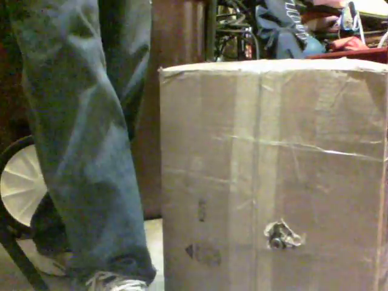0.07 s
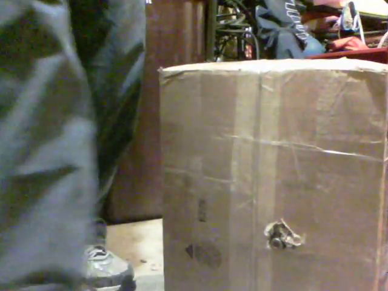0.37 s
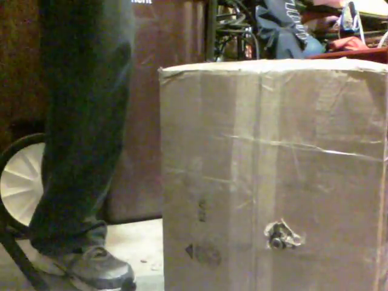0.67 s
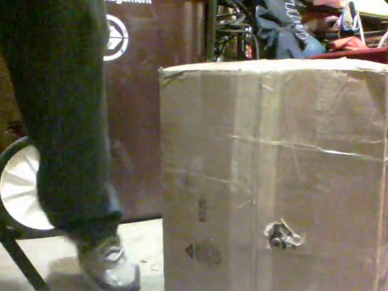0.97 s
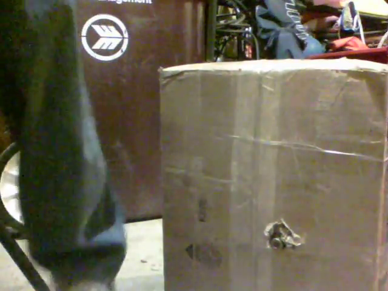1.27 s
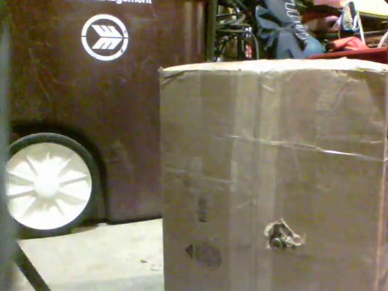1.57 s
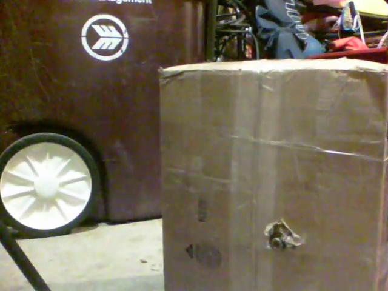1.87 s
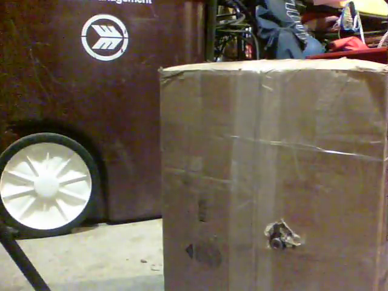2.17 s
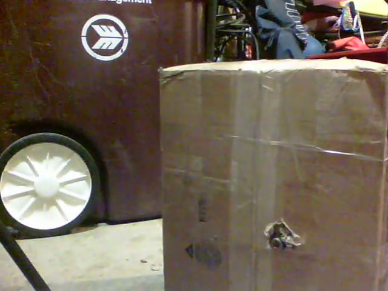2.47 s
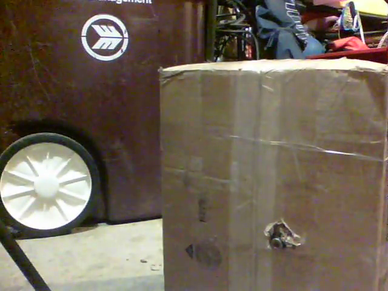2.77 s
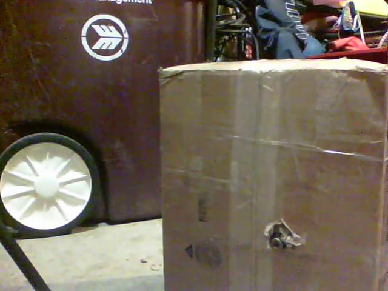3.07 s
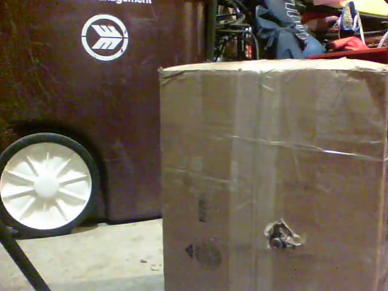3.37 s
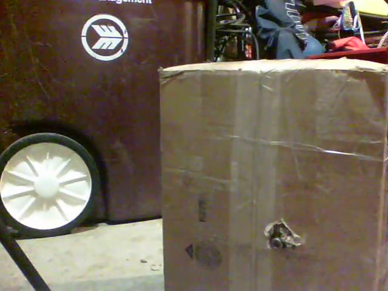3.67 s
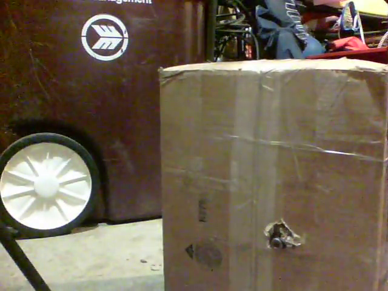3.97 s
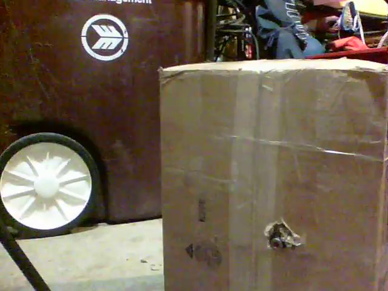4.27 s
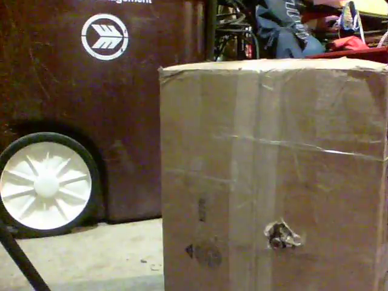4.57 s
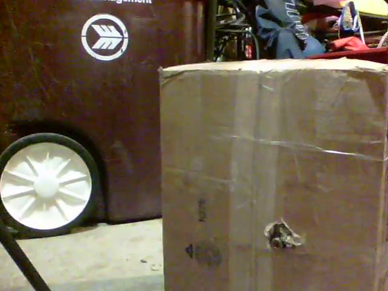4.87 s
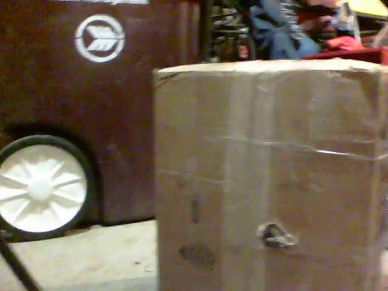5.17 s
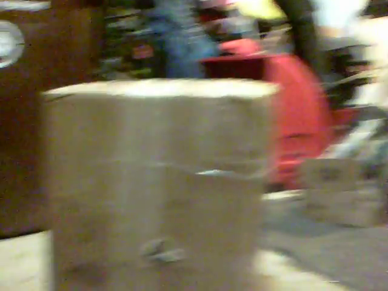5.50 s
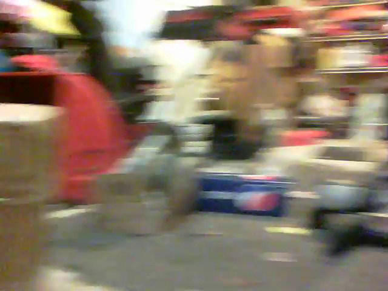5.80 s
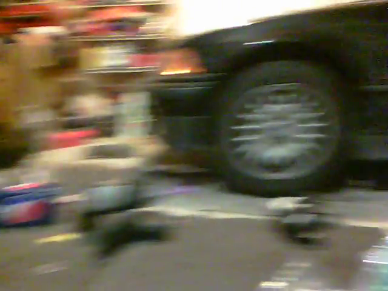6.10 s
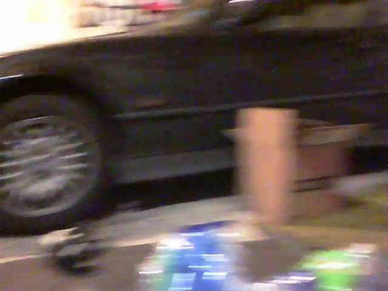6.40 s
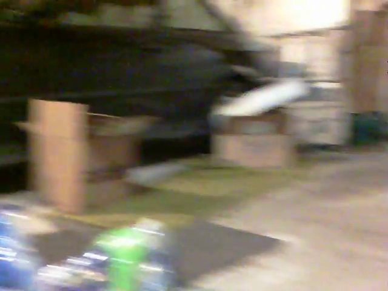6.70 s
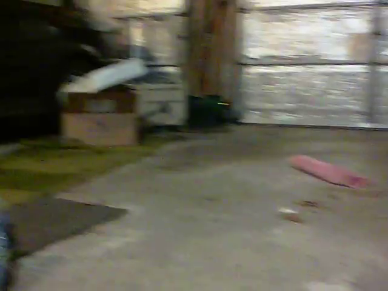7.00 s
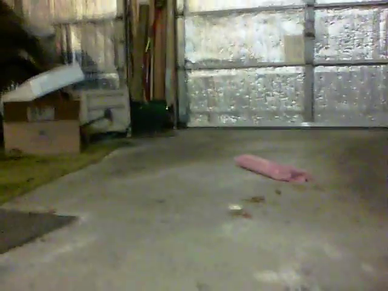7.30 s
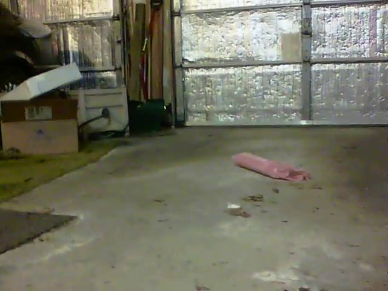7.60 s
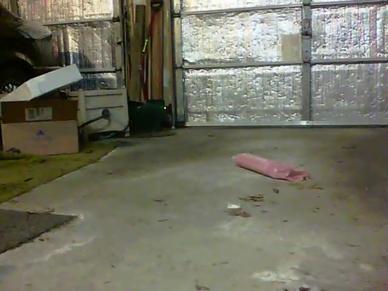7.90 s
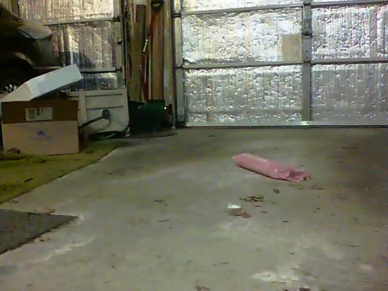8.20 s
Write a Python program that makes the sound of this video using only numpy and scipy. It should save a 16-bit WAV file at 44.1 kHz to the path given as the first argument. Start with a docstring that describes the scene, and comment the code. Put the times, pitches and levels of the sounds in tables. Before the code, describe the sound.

Shoes scuff and tick on a gritty concrete garage floor over a faint hum and hiss. About halfway through, a large cardboard box is gripped, bumped and dragged in a quick cluster of hollow thumps. After a short lull, a loud, dull knock right by the microphone overloads it. A sharp click follows, and the box thumps and scrapes a few more times, a little quieter.

```python
"""Shoes scuff and tick on a concrete garage floor, over a faint hum, as someone walks round a large
cardboard box. The box is gripped, bumped, dragged and set down in hollow thumps: each impact excites
the modes of its body, its enclosed air and its panels, and stick-slip friction makes it judder.
A knock close to the microphone overloads it, and the box thumps a few more times while the automatic
gain control holds the level down."""
import sys
import numpy as np
from scipy import signal
from scipy.fft import rfft, irfft
from scipy.io import wavfile
from scipy.ndimage import uniform_filter1d

SR = 44100
rng = np.random.default_rng(int(sys.argv[2]) if len(sys.argv) > 2 else 0)


def put_to_file(sound):
    """Save the sound as 16-bit audio at rate SR, in the file named by the first command-line argument."""
    columns = np.atleast_2d(sound).T  # one column per channel
    safe = np.clip(columns, -1, 1)
    whole_steps = np.round(safe * 32767)
    wavfile.write(sys.argv[1], SR, whole_steps.astype(np.int16))


N = 363815
TIME = np.arange(N) / SR
RING_TIME = TIME[:SR]  # the first second after an impact


def amp(db):
    """Amplitude ratio of a level in decibels."""
    return 10 ** (np.asarray(db) / 20)


def unit(x):
    """Normalisation to rms 1."""
    return x / np.sqrt(np.mean(x ** 2) + 1e-20)


def read(points, hz):
    """Interpolation of a table on a log-frequency axis."""
    f, value = np.transpose(points)
    return np.interp(np.log(hz + 1), np.log(f + 1), value)


def add(mix, s, sound):
    """Superposition: a sound joins the mix at s seconds."""
    part = mix[round(s * SR):][:len(sound)]
    part += sound[:len(part)]


def through(x, response):
    """Convolution with an impulse response, cut to the scene's length."""
    return signal.oaconvolve(x, response)[:N]


def passband(x, order, hz, kind):
    """Maximally flat low-, high- or band-pass filtering."""
    return signal.sosfilt(signal.butter(order, hz, kind, fs=SR, output="sos"), x)


def colour(x, spectrum, size=4096):
    """Minimum-phase filtering to a spectral shape; white noise keeps its power."""
    log_gain = np.log(amp(read(spectrum, abs(np.fft.fftfreq(size, 1 / SR)))))
    response = np.exp(np.conj(signal.hilbert(log_gain)))
    taps = np.fft.ifft(response).real[:size // 2]
    return through(x, taps / np.linalg.norm(taps))


def drift(hz):
    """Random fluctuation of rms 1, its spectrum falling away above hz."""
    rolloff = np.exp(-(np.fft.rfftfreq(N, 1 / SR) / hz) ** 2)
    return unit(irfft(rfft(rng.standard_normal(N)) * rolloff, N))


def ring(modes):
    """Modal impulse response: a sum of damped sinusoids."""
    return sum(amp(db - 60 * RING_TIME / t60) * np.sin(2 * np.pi * hz * RING_TIME)
               for hz, db, t60 in modes)


def contact(decay_s, rise_s):
    """Contact noise: a dying spray of tiny impacts as two rough faces meet."""
    return rng.standard_normal(SR) * np.exp(-RING_TIME / decay_s) * (1 - np.exp(-RING_TIME / rise_s))


def push(length_s):
    """Force pulse of unit impulse: the longer it lasts, the less treble it excites."""
    force = np.exp(-4 * RING_TIME / length_s) * RING_TIME
    return force / force.sum()


def stroke(peak_s, db, fall_s, rise_s=None):
    """Exponential swell and decay of sliding pressure; by default the swell is the quicker."""
    rise_s = rise_s or 0.69 * fall_s
    distance = np.maximum((peak_s - TIME) / rise_s, (TIME - peak_s) / fall_s)
    return amp(db) * np.exp(-np.minimum(distance, 20))


# Reverberation time of the garage: (frequency [Hz], T60 [s])
GARAGE_T60 = [(60, 1), (150, 0.64), (400, 0.38), (1000, 0.34), (3000, 0.44), (7000, 0.38)]
def garage(x, wet_db, spacing=22):
    """Reverberation: dense reflections from walls and clutter, each band absorbed at its own rate."""
    taps = np.zeros(SR)
    slots = np.arange(round(.006 * SR), SR - spacing, spacing)
    polarity = rng.choice([-1., 1.], SR)[:len(slots)]
    taps[slots + rng.integers(0, spacing, SR)[:len(slots)]] = polarity
    hz, t, bands = signal.stft(taps, SR, nperseg=256)
    absorption = amp(-60 * t / read(GARAGE_T60, hz)[:, None])
    tail = signal.istft(bands * absorption, SR, nperseg=256)[1]
    return x + amp(wet_db) * through(x, tail / np.linalg.norm(tail))


# Spectrum of the noise floor: (frequency [Hz], relative level [dB])
NOISE_SPECTRUM = [(12, -9), (21, 7.5), (43, -6), (96, -9.5), (160, -15), (260, -16), (480, -21),
                  (600, -18.5), (800, -24.5), (1500, -28.5), (2850, -31), (4930, -35.5), (6000, -40)]
def noise_floor(level_db=-39.45, flutter_db=2.94):
    """Broadband noise: microphone hiss and room rumble, the rumble modulated in amplitude."""
    shape = amp(read(NOISE_SPECTRUM, np.fft.rfftfreq(N, 1 / SR)))
    noise = irfft(rfft(rng.standard_normal(N)) * shape, N)
    rumble = passband(noise, 2, 120, "low")
    return amp(level_db) * unit(noise + rumble * (amp(flutter_db * drift(9.5)) - 1))


# Partials of an appliance's hum: (frequency [Hz], level [dB], modulation depth [ratio])
HUM_PARTIALS = [(93.5, -58, 1), (215.6, -50, 0.19), (340, -65.5, 0.18), (610, -63.5, 0.2), (738, -69, 0.5)]
def hum():
    """Amplitude and phase modulation: each partial of the hum wavers slowly."""
    out = np.zeros(N)
    for hz, db, depth in HUM_PARTIALS:
        envelope = amp(db) * np.sqrt(2) * (1 + depth * drift(3.9))
        out += envelope * np.sin(2 * np.pi * hz * TIME + 2 * depth * drift(2.2))
    return out


def snap(hz, half_width_octaves=0.31):
    """Band-limited transient: brief contact noise, its power independent of bandwidth."""
    band = np.clip(hz * 2 ** (np.array([-1, 1]) * half_width_octaves), 1, SR / 2 - 1)
    burst = passband(contact(decay_s=0.0049, rise_s=0.0023), 1, band, "band")
    return burst * np.sqrt(SR / np.pi / np.ptp(band))


# Shoes, hands and cardboard catching: (time [s], level [dB], centre frequency [Hz])
CATCHES = [(0.498, -23.5, 2960), (0.5607, -11.5, 1400), (0.599, -25, 2430), (0.788, -31, 1540),
           (1.1174, -31, 4700), (1.3009, -35.5, 4700), (1.5362, -29, 1400), (1.8703, -26.5, 2080),
           (1.9738, -32, 2390), (2.021, -33.5, 2240), (2.349, -29, 2200), (2.4826, -29, 4380),
           (2.583, -31, 2400), (2.662, -33.5, 4030), (2.9876, -29.5, 2430), (3.124, -28, 2060),
           (3.688, -16.5, 1340), (3.8659, -16.5, 2560), (7.0076, -30.5, 1340), (7.0784, -21, 2160),
           (7.1154, -10.5, 3110)]
def ticks(grit_db=-20.5, grit_spread_db=4.5, grit_hz=2400, grit_within_s=0.081, specks=2):
    """Small sources radiate little bass: sharp ticks, each followed by specks of loose grit."""
    out = np.zeros(N)
    for s, db, hz in CATCHES:
        add(out, s, amp(db - 1) * snap(hz))
        for late, (loudness, octaves) in zip(rng.random(specks), rng.standard_normal((specks, 2))):
            speck = amp(db + grit_db + grit_spread_db * loudness) * snap(grit_hz * 2 ** octaves)
            add(out, s + late * grit_within_s, speck)
    return garage(passband(out, 3, 950, "high"), wet_db=-6)


# Drags of the box over concrete: (peak time [s], level [dB], decay time [s])
BOX_DRAGS = [(4.49, -9, 0.094), (7.62, -14.5, 0.049), (7.76, -17.5, 0.13)]
def judder(slip_hz=54.06, unsteadiness=0.42):
    """Stick-slip friction: returns the pressure of the drags and their uneven train of slips."""
    pressure = sum(stroke(*drag) for drag in BOX_DRAGS)
    cycles = np.cumsum(slip_hz * np.exp(unsteadiness * drift(40))) / SR
    return pressure, pressure * np.diff(np.floor(cycles), prepend=0)


# Swishes of soles, cloth and hands: (peak time [s], level [dB], decay time [s])
SCUFFS = [(.505, -35.5, 0.045), (.62, -39, 0.029), (.73, -42, 0.03), (1.543, -37.5, 0.015),
          (1.91, -51, 0.28), (2.525, -43, 0.086), (2.67, -41.5, 0.025), (3.208, -31, 0.047),
          (3.712, -25, 0.029), (3.92, -41, 0.23), (4.12, -37.5, 0.049), (4.43, -34.5, 0.22),
          (4.72, -46, 0.044), (5.95, -48, 0.29), (6.98, -45, 0.24), (7.145, -33, .038), (7.88, -34, 0.025),
          (8.051, -35, 0.082)]
def rubbing(grains_per_s=700, uneven_db=2.5, drag_db=-28.5, scrape_db=-23, scrape_rise_s=0.0027):
    """Sliding friction: hiss and catching grains in each swish, each drag and a scrape after each tick."""
    strokes = [stroke(*scuff) for scuff in SCUFFS]
    strokes += [stroke(s, db + drag_db, fall_s) for s, db, fall_s in BOX_DRAGS]
    strokes += [stroke(s + 2 * scrape_rise_s, db + scrape_db, fall_s=0.048, rise_s=scrape_rise_s)
                for s, db, _ in CATCHES]
    pressure = np.sqrt(sum(each ** 2 for each in strokes))  # incoherent sources add in power
    sizes = amp(3.5 * np.minimum(rng.exponential(1, N), 5)) * rng.choice([-1, 1], N)
    grains = unit(sizes * (rng.random(N) < grains_per_s / SR))
    friction = unit(grains + 0.98 * rng.standard_normal(N)) * amp(uneven_db * drift(38))
    return friction * pressure


# Spectrum of the rubbing surfaces: (frequency [Hz], relative level [dB])
SURFACE_SPECTRUM = [(100, -17.5), (400, 1.5), (850, -5.5), (1200, -0.5), (2500, -0.5), (3500, -4),
                    (5000, -3.5), (7000, -8.5)]
def surfaces(friction):
    """Source and filter: the rubbing surfaces colour the friction noise they radiate."""
    return garage(colour(friction, SURFACE_SPECTRUM), wet_db=-8)


# Jolts of the microphone: (time [s], level [dB], hold [s], decay time [s], corner frequency [Hz])
MICROPHONE_JOLTS = [(0.439, -29.5, 0.0033, 0.01, 600), (6.831, 15.5, 0.027, 0.00028, 233),
                    (6.858, -11.5, 0.01, 0.014, 80), (6.963, -24.5, 0.076, 0.16, 47),
                    (7.086, -22, 0.019, 0.14, 46.7), (7.116, -21, 0.0037, 0.026, 445)]
def jolts(mount_hz=116, mount_db=-26, mount_t60=0.42):
    """Structure-borne sound: dull knocks reach the microphone by the floor and its mount, which rings."""
    knocks, mount = np.zeros((2, N))
    for s, db, hold_s, decay_s, corner_hz in MICROPHONE_JOLTS:
        # the shaking thins out gently above the corner, then ends steeply
        shake = passband(rng.standard_normal(2 * SR), 1, corner_hz, "low")
        shake = passband(shake, 3, [58, corner_hz * 3.47], "band")[SR:]
        attack = 1 - np.exp(-RING_TIME / 0.00039)
        force = attack * np.exp(-np.maximum(RING_TIME - hold_s, 0) / decay_s)
        shake_rms = np.sqrt(np.sum((shake * force) ** 2) / np.sum(force ** 2))
        add(knocks, s, amp(db) * force * shake / shake_rms)
        add(mount, s, amp(db) * ring([(mount_hz, mount_db, mount_t60)]))
    return garage(knocks, wet_db=-36.5) + mount


# Spectrum of a slap on cardboard: (frequency [Hz], relative level [dB])
SLAP_SPECTRUM = [(40, -28.5), (120, -5), (220, -3), (450, 0.5), (680, -0.5), (950, -10.5), (1250, -16.5),
                 (2000, -35), (5000, -53)]
# Modes of the cardboard panels: (frequency [Hz], relative level [dB], T60 [s])
BENDING_MODES = [(302, 7, 0.069), (406, -3, 0.29), (448.6, 4, 0.16), (540.4, 4, 0.17), (606, -3, 0.12),
                 (665, -19.5, 0.29), (907, -6.5, 0.056), (1014, -24.5, 0.19), (1085, -17.5, 0.071),
                 (1190, -33.5, 0.16)]
def panels(slap, scraping):
    """Plate vibration: slaps and scraping give a broadband response and ring the bending modes."""
    modes = ring(BENDING_MODES)
    broadband = colour(slap + amp(-19) * scraping, SLAP_SPECTRUM)
    ringing = through(slap + amp(-4) * scraping, modes / np.linalg.norm(modes))
    return garage(broadband + amp(-5) * ringing, wet_db=-7)


# Deep swings of the whole box and the air around it: (frequency [Hz], level [dB], T60 [s])
BODY_MODES = [(75.9, -4.5, 0.55), (87.6, -4.5, 0.23), (116, 2, 0.2), (115, -9.5, 0.74)]
# Boom of the enclosed air and the broad sides: (frequency [Hz], level [dB], T60 [s])
CAVITY_MODES = [(156.3, -2.5, 0.33), (217, -13.5, 0.27), (237, -10.5, 0.45), (267, -11, 0.32),
                (311.4, -10.5, 0.32), (414, -20, 0.16)]
def body(shove, knock):
    """Resonance: slow shoves swing the whole box, and shorter knocks boom in its cavity."""
    return garage(through(shove, ring(BODY_MODES)) + through(knock, ring(CAVITY_MODES)), wet_db=-12)


# Spectrum of a crack along an edge: (frequency [Hz], relative level [dB])
EDGE_SPECTRUM = [(200, -51), (800, -8), (1500, 10), (3000, 4), (5000, -4), (7000, -10.5)]
# Blows on the box: (time [s], force on the walls [dB], thud of its weight [dB], edge crack [dB])
IMPACTS = [(3.964, -37, -15.5, -43), (4.049, -7.5, -18, -18), (4.102, -28, -7.5, -35),
           (4.144, -6.5, -15.5, -22.5), (4.311, -9, -28, -15.5), (4.368, -6.5, -10.5, -33),
           (4.433, -4.5, -27, -20), (4.456, -3.5, -27, -29), (4.496, -10.5, -35.5, -32),
           (4.685, -7.5, -10, -22), (4.738, -2, -8, -18), (4.911, -39, -27, -30), (5.026, -44, -26, -56),
           (7.352, -13.5, -28, -33.5), (7.436, -12.5, -18.5, -23), (7.575, -5, -31, -14),
           (7.689, -14, -20, -22.5), (7.823, -8, -11.5, -22.5), (7.859, 0, -5, -10), (8.051, -10, -19, -22)]
def box(contact_s=0.011, softening=0.51, rebound_s=0.02, rebound_spread=0.2026, rebound_db=-5):
    """Impact excitation: each blow thuds, booms, slaps and cracks; drags drive the cavity and panels."""
    shove, knock, slap, crack = np.zeros((4, N))
    rebounds = rebound_s * np.exp(rebound_spread * rng.standard_normal(len(IMPACTS)))
    for (s, force_db, thud_db, edge_db), rebound in zip(IMPACTS, rebounds):
        add(shove, s, amp(thud_db) * push(0.0041))
        add(knock, s, amp(force_db - 8) * push(0.0014))
        stretch = amp(-softening * force_db)  # a weaker blow stays in contact longer
        for delay, db in (0, 0), (rebound, rebound_db):  # the box rocks and slaps a second time
            flex = contact(contact_s * stretch, rise_s=0.0025) / np.sqrt(stretch)
            add(slap, s + delay, amp(force_db + db - 0.5) * flex)
        add(crack, s, amp(edge_db - 3) * contact(decay_s=0.006, rise_s=0.00025))
    pressure, slips = judder()
    knock += amp(-2.5) * through(slips, push(0.0014))
    scraping = pressure * rng.standard_normal(N)
    out = body(shove, knock) + panels(slap, scraping)
    out += garage(colour(crack, EDGE_SPECTRUM), wet_db=-3.5)
    return passband(out, 3, 56, "high")  # the box's sound thins out below about 56 Hz


def scene():
    """Superposition of all sources at one microphone."""
    return (box() + ticks() + surfaces(rubbing()) + jolts() + noise_floor() + hum())[None]


def record(dry, rolloff_hz=5400, cutoff_hz=6500, duck_db=7, lag_s=0.44, overload_s=0.0044):
    """Band limiting and saturation; after a long overload the gain control backs off and stays down."""
    hz = np.fft.rfftfreq(N, 1 / SR)
    heard = irfft(rfft(dry) / np.sqrt(1 + (hz / rolloff_hz) ** 18), N)
    band_limit = signal.firwin(161, cutoff_hz, window=("kaiser", 8), fs=SR)
    heard = signal.oaconvolve(heard, band_limit[None], "same")
    window = round(0.03 * SR)
    over_full_scale_s = uniform_filter1d(1. * (abs(heard[0]) > 1), size=window) * window / SR
    latched = np.maximum.accumulate(over_full_scale_s > overload_s)
    backed_off = np.interp(TIME - lag_s, TIME, latched)
    driven = heard * amp(-duck_db * uniform_filter1d(backed_off, size=4000))
    clipped = driven / (1 + driven ** 14) ** (1 / 14)
    return signal.oaconvolve(clipped, signal.firwin(101, 17000, fs=SR)[None], "same")


dry = scene()
out = record(dry)
put_to_file(out)
```